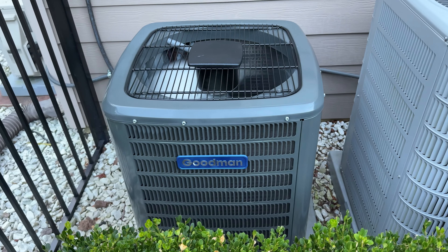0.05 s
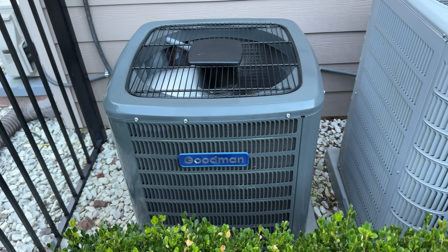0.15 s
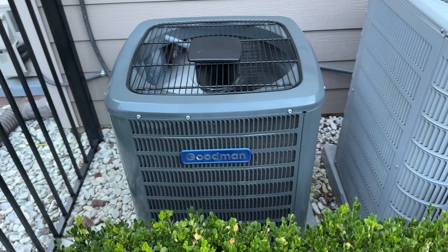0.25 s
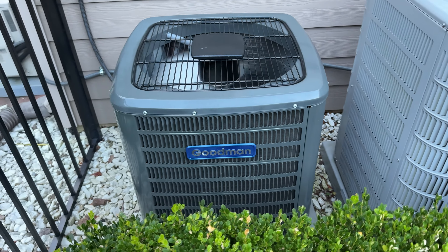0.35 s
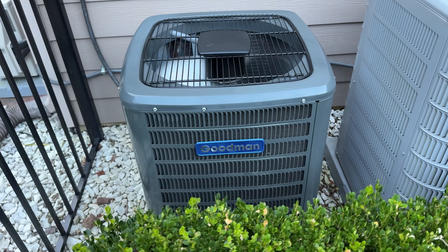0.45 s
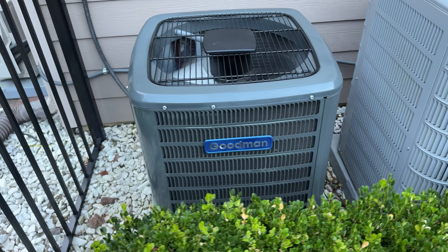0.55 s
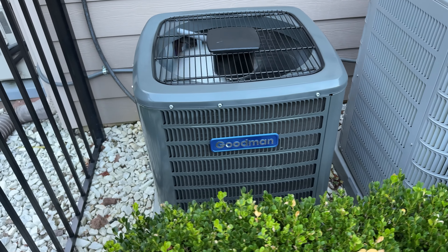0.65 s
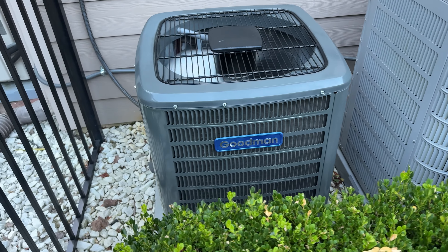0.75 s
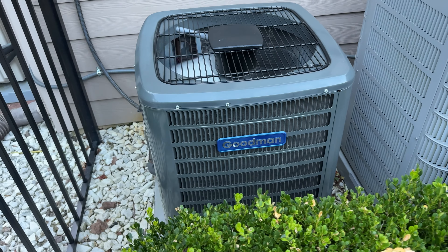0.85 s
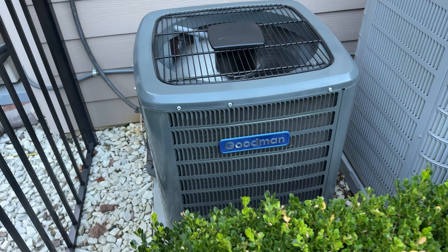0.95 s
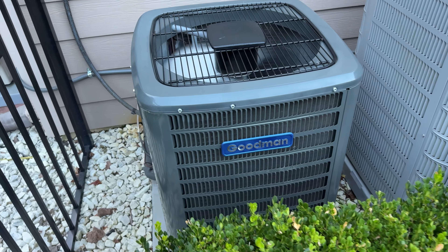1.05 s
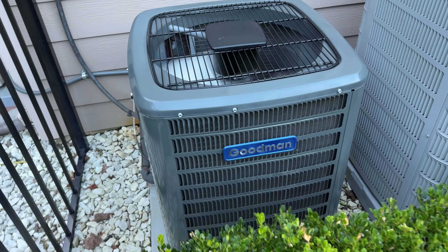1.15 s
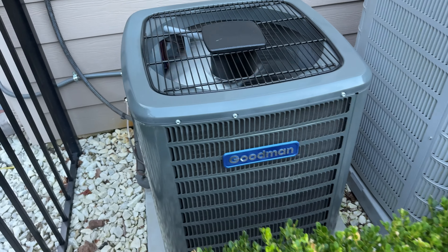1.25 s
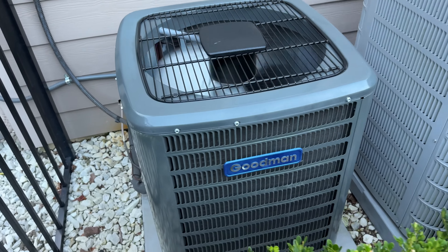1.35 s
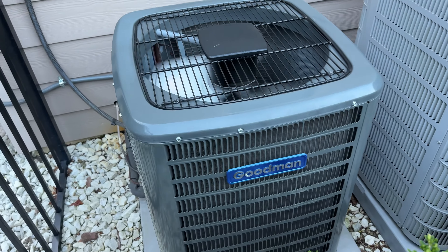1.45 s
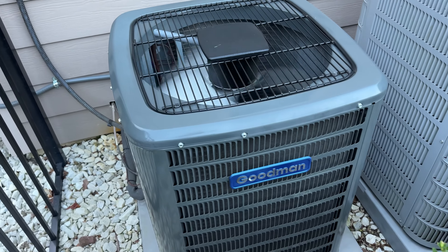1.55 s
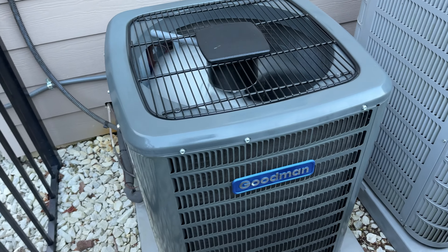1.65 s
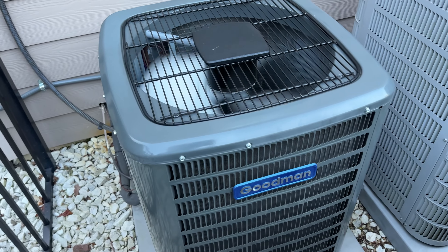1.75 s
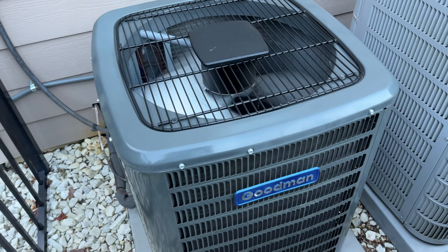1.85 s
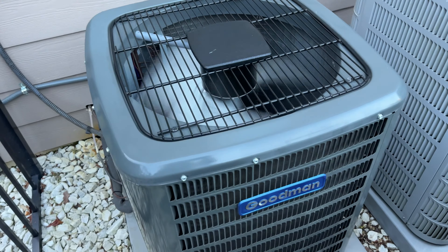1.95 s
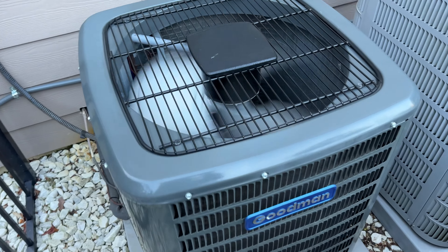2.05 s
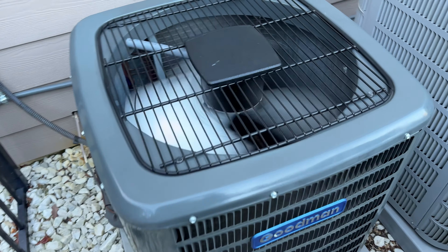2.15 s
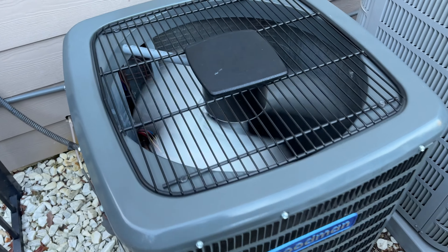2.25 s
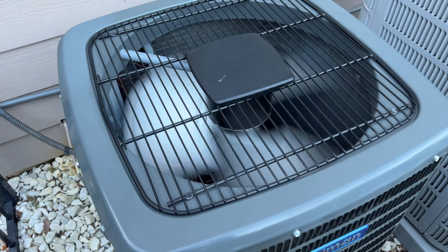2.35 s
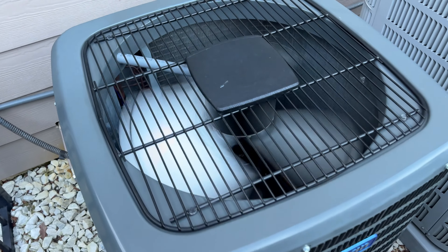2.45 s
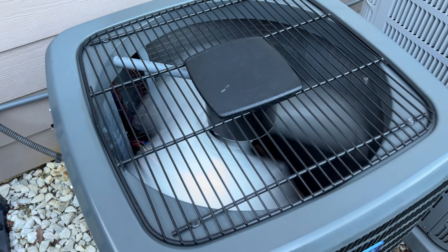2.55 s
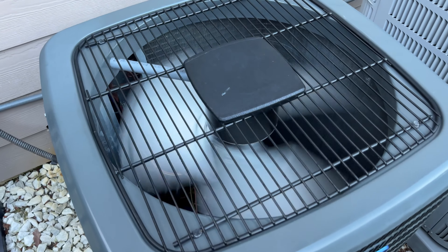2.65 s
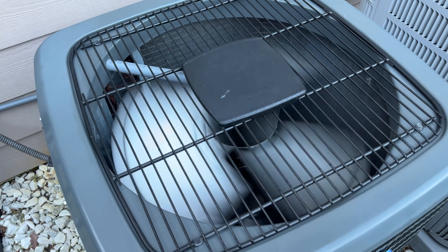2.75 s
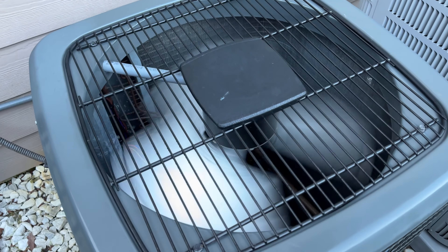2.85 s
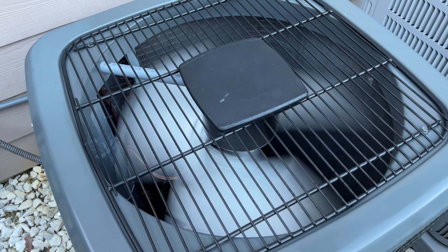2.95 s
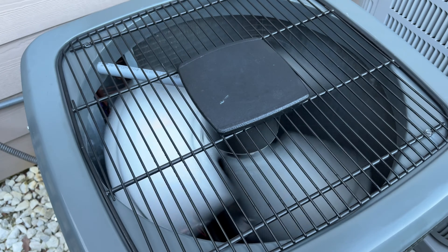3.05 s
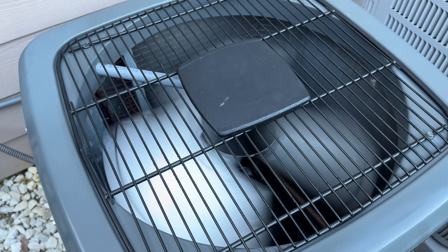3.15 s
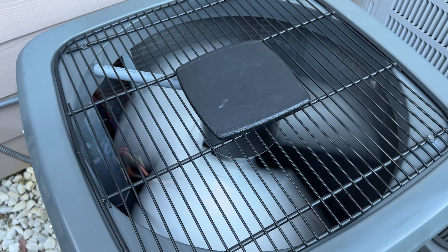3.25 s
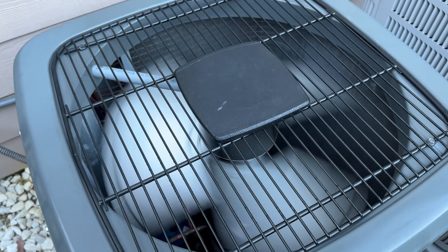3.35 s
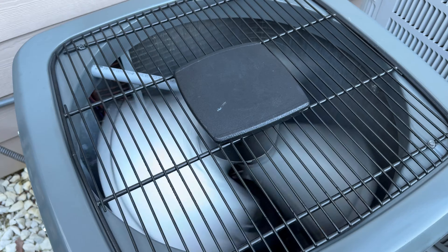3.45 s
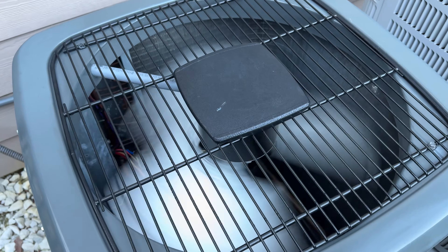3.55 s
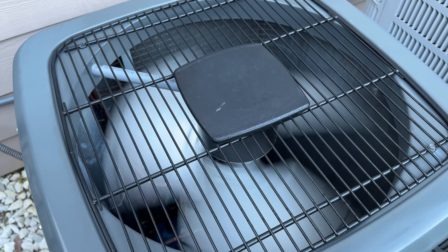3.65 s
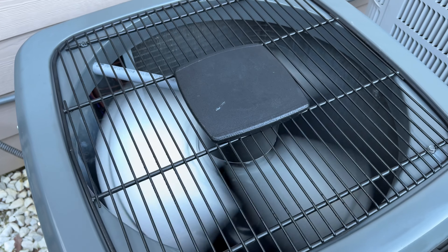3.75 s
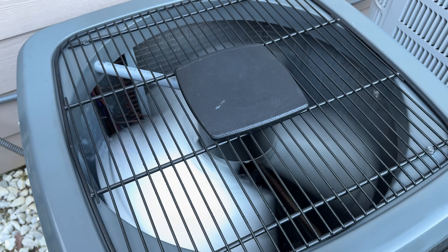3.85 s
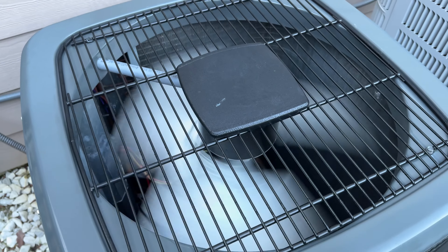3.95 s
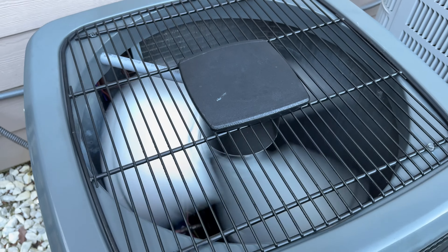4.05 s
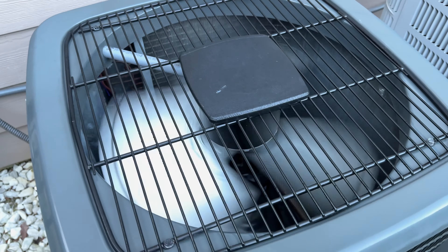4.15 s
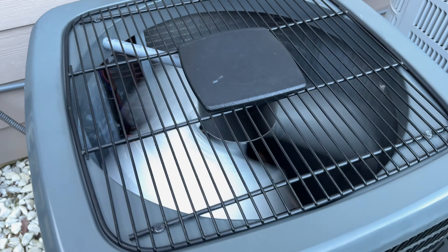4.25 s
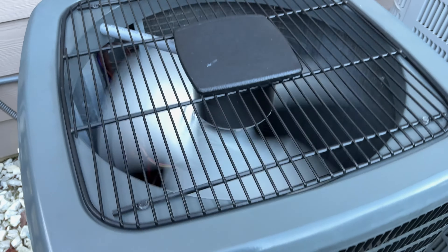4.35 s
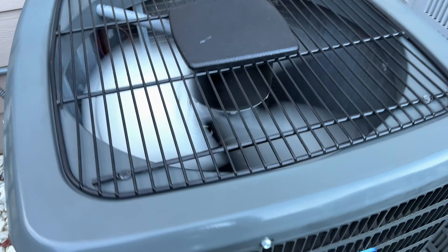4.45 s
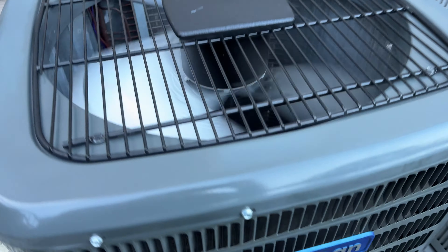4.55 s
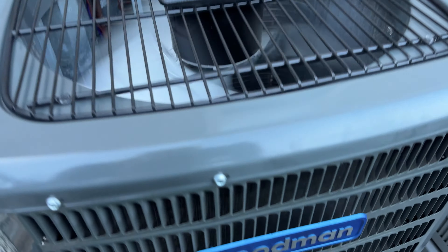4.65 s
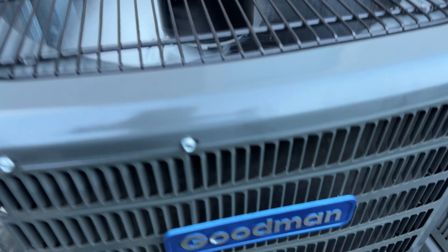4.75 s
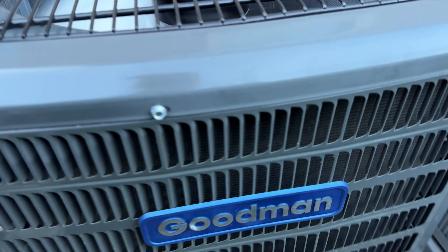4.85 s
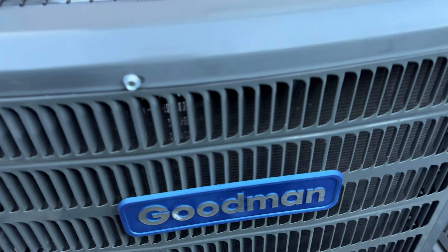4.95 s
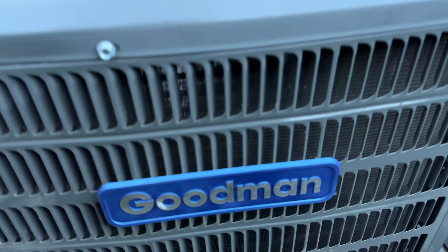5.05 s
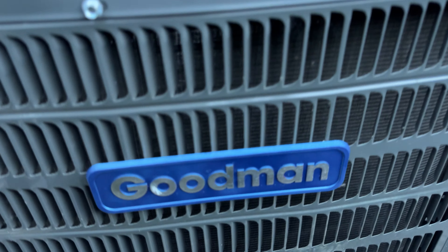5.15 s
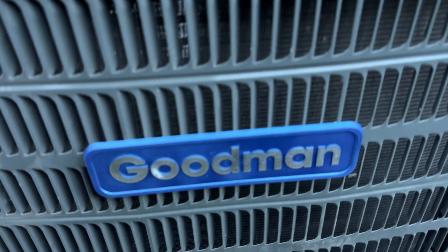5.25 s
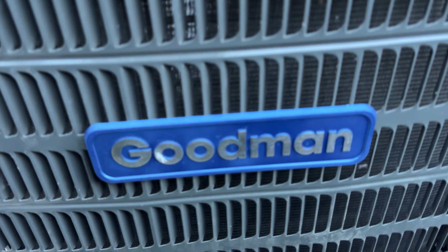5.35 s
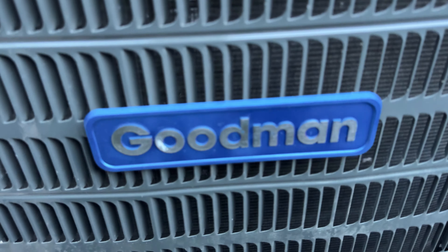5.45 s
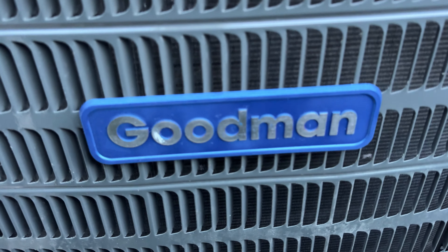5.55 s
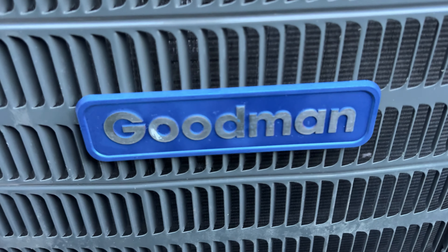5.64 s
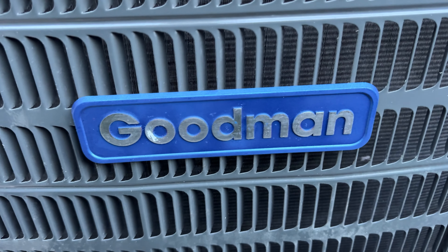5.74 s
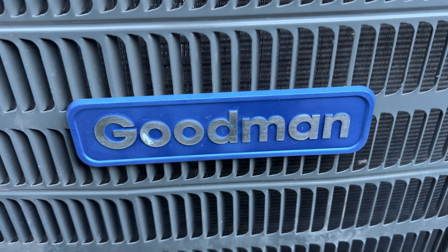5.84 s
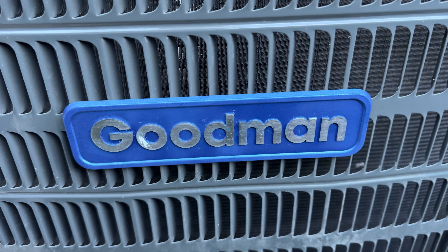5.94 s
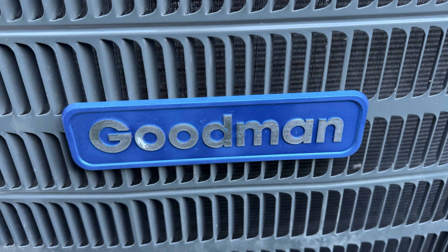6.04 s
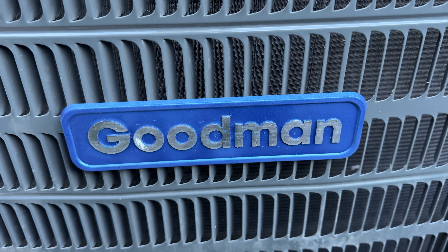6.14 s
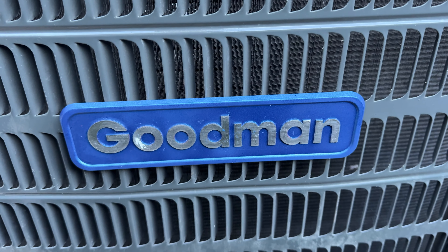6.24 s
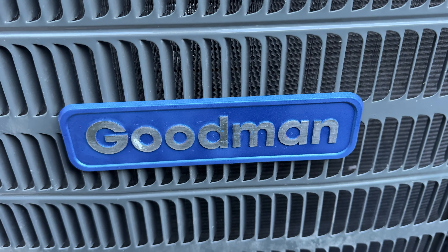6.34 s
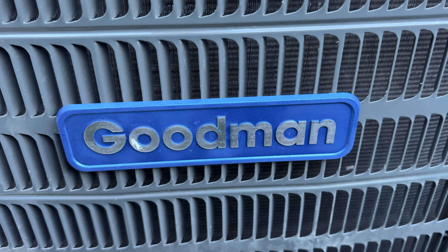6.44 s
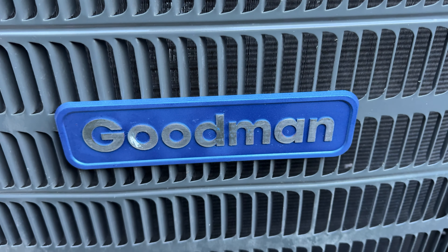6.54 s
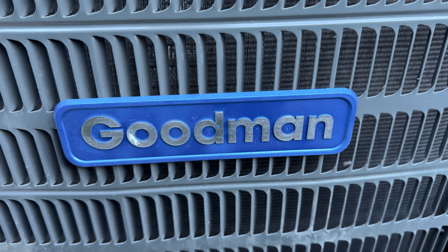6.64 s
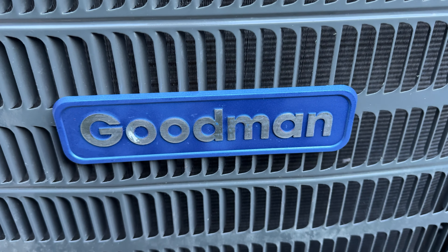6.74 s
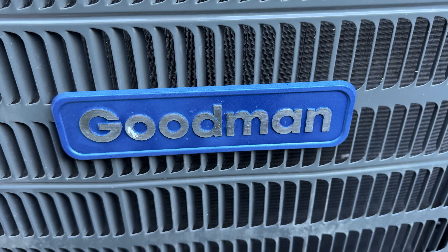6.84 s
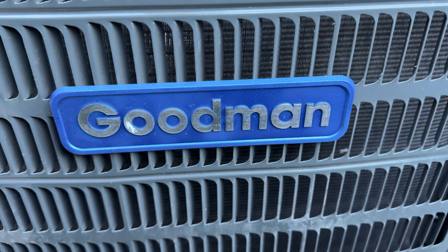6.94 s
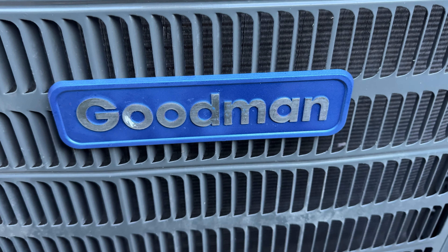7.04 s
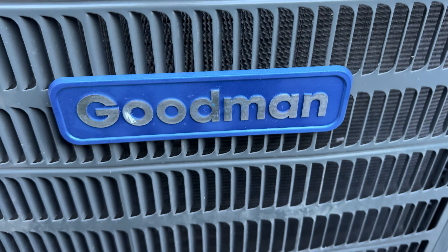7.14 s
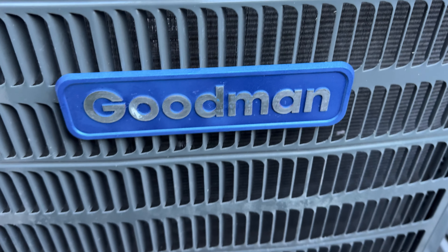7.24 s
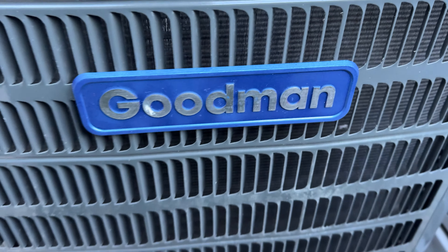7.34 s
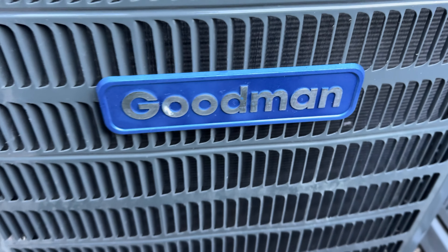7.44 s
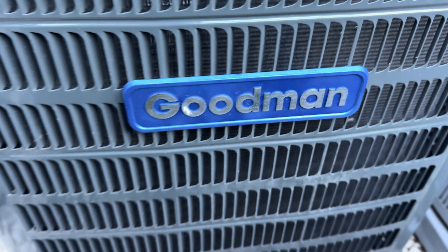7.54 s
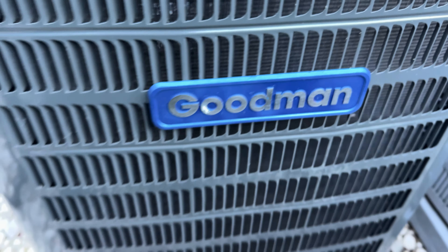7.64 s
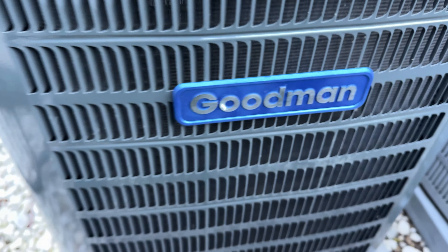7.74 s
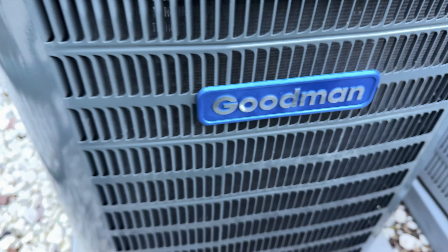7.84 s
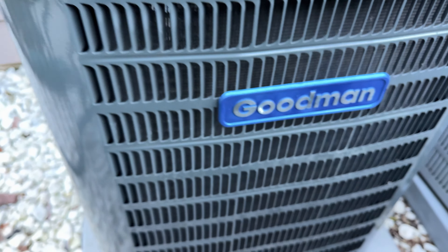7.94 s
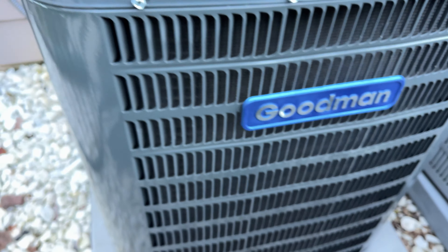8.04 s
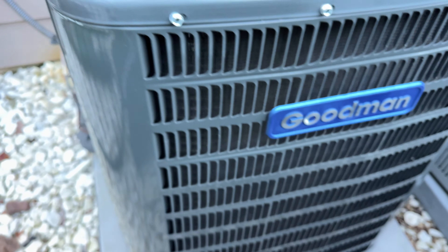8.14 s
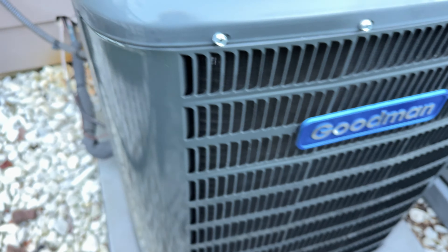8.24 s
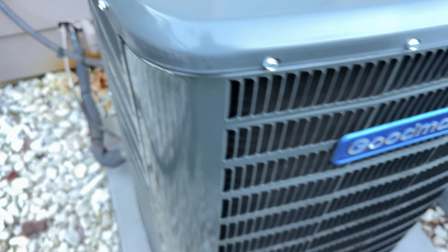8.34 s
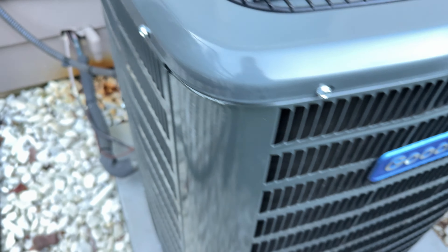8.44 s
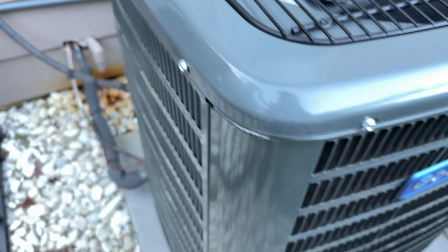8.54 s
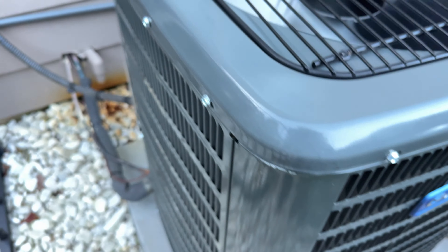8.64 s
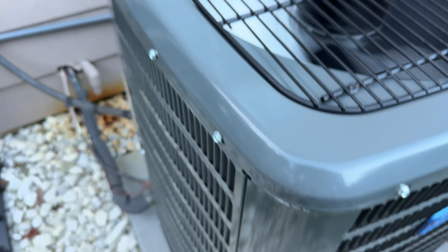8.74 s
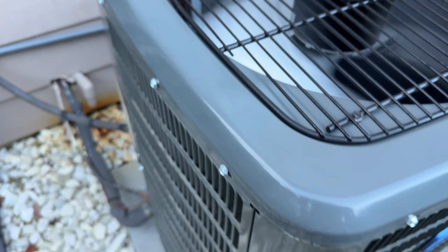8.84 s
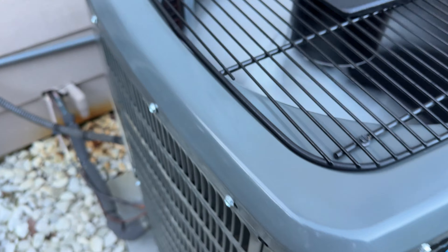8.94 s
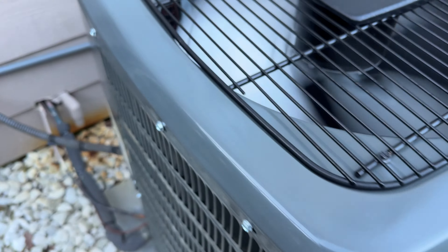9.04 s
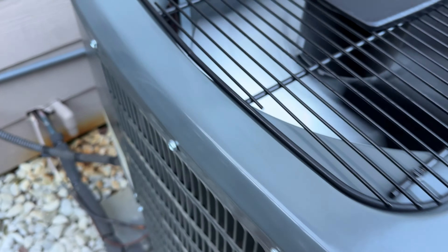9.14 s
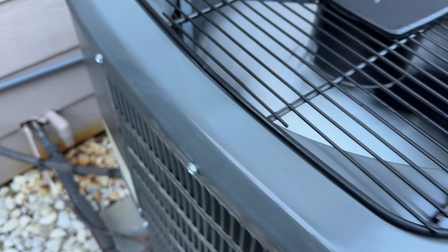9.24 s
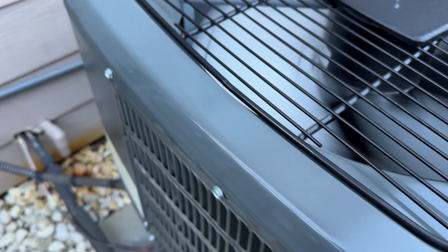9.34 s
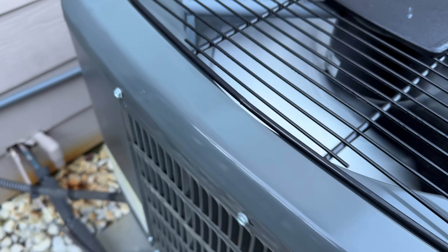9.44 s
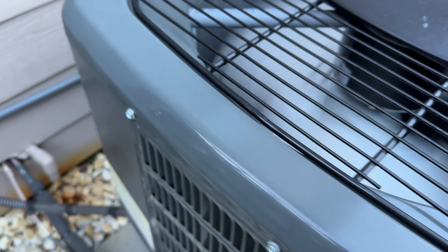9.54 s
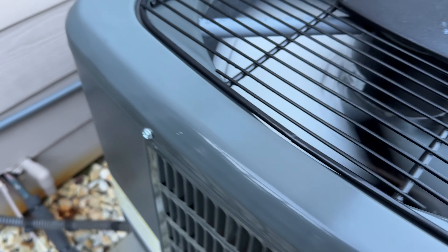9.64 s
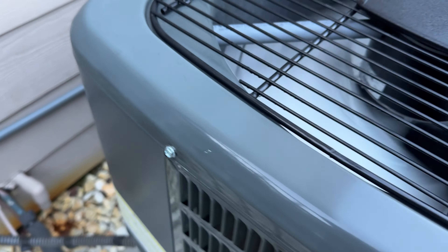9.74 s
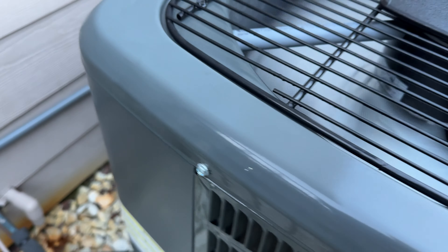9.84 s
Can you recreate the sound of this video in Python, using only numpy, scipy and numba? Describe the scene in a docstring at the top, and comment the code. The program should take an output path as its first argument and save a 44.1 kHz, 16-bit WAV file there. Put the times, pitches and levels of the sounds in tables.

```python
"""Heat pump walk-around

An outdoor heat pump runs while a hand-held stereo microphone walks up, passes over the fan, rests by
the side louvres and rises again. Blade beat, mains hum, motor tones and compressor whine are sines over
rushing air, all following the microphone's position. Over the fan, eddies buffet the microphone."""
import sys
import numpy as np
from scipy import signal
from scipy.io import wavfile
from scipy.ndimage import uniform_filter1d
from numba import njit

SR = 44100
rng = np.random.default_rng(int(sys.argv[2]) if len(sys.argv) > 2 else 0)


def bounce(signal):
    """Save signal as a 16-bit WAV file at the path given by the first command-line argument."""
    frames = np.transpose(np.atleast_2d(signal))
    limited = np.clip(frames, -1, 1)
    pcm = np.round(limited * 32767).astype(np.int16)
    wavfile.write(sys.argv[1], SR, pcm)


N = 436149

BLADE_HZ, HUM_HZ, COMPRESSOR_HZ = 42.93, 119.97, 58.53
SOUND_M_PER_S = 343
BLOCK = 256  # samples per control step of the tones

# Microphone path. Each row: time in seconds, distance in m, facing the louvres 0-1, over the outlet 0-1.
WALK = [(0.0, 1.47, 0.1, 0.05), (1.0, 1.4, .03, 0.05), (1.9, 1.23, .2, 0.4), (2.5, 0.93, 0.26, 0.83),
        (3.2, 0.89, 0.05, .95), (3.6, 0.76, 0, 0.96), (4.0, 0.74, .1, 0.92), (4.5, .7, 0.34, 0.74),
        (5.0, 0.59, 0.6, 0.68), (5.5, .47, 0.95, .1), (6.3, .43, 0.94, 0.11), (7.5, .45, .95, 0.18),
        (8.0, 0.61, .65, 0.22), (8.3, 0.53, 0.4, 0.22), (8.9, 0.53, 0.39, 0.52), (9.5, 0.44, 0.08, 0.67),
        (9.89, 0.44, 0.24, 0.47)]
# Stereo width by frequency: how alike left and right sound, and how far right leads.
# Each row: frequency in Hz, left-right coherence, right lead in radians.
STEREO_IMAGE = [(60, 0.83, 0), (250, 0.97, 0), (600, 0.88, 0), (1170, 0.68, -0.75), (1900, 0.31, -0.5),
                (3400, 0.82, -2), (5200, .15, -.6), (6200, .45, 0), (7100, .1, 0), (7800, .7, 0),
                (8700, .75, .9), (9500, 1, np.pi), (11440, 1.05, 7.5), (12300, 1.05, 8.5),
                (13700, 1.05, 11), (15400, 1.05, 15.5)]
# Gains of the air's rumble, roar, whoosh and hiss.
# Each row: dB at 1 m, dB per halved distance, dB added at the louvres, dB added over the outlet.
AIR_BANDS = [(-4, 2.9, 1, 5.7), (-1.07, 1.12, 1, 6.45), (0.1, 4.3, -3, 1.1), (3.5, 0.47, -0.2, 2.4)]


def blades_and_hum(t, sent_s):
    """Blade beat and mains hum with their octaves; the balance shifts as the hand turns."""
    # One row per tone of hz. Each row: level in dB at 1 m, then gains in dB as in AIR_BANDS.
    tone_levels = [(-52.5, 15, -5, 11), (-39, 5, -2.5, 3.5), (-38, 2.9, -1.7, 5.5), (-30.5, -1, -2.5, 7),
                   (-35.5, 1.5, -1, 4.5)]
    # Each row: time in seconds, left minus right in dB.
    hand_turn = [(0.0, 0.5), (7.65, -0.5), (9.14, -2.5), (9.89, -5.5)]
    hz = np.array([BLADE_HZ, 2 * BLADE_HZ, HUM_HZ, 2 * HUM_HZ, 4 * HUM_HZ])
    level_db = walk_db(tone_levels, t) + bass_dip_db(hz, t) + 0.84 * drift(len(hz), 5.1, t)
    pan_db = np.array([1.6, 1.9, 0.7, -0.0069, -0.52])
    lead_rad = np.array([0.27, 0.084, 0.046, 0.16, 0.21])
    turn_db = at_times(hand_turn, np.arange(N) / SR)[0]
    return stereo_tones(hz, 0 * hz, level_db, pan_db, lead_rad, sent_s) * amp(np.outer([.5, -.5], turn_db))


def fan_motor(t, sent_s, near_db):
    """Motor tones: hum multiples shifted by whole shaft turns; higher ones waver more."""
    # Each row: frequency in Hz, level in dB at the louvres, level in dB elsewhere.
    motor_tones = [(129.8, -48, -53.5), (173.2, -47.5, -67), (226.6, -52, -56), (256, -48, -50),
                   (271, -43, -53), (283, -50, -50.8), (302, -46, -49), (327.3, -52, -60), (343, -67, -47),
                   (387, -45, -48), (528, -52.5, -54), (715, -56, -57), (1270, -47.5, -56),
                   (1309, -52, -57), (1383, -47, -59.1), (1440, -56, -68.4), (1407, -48, -68),
                   (1425, -56, -64), (1426, -51, -58), (1513, -54, -61), (2340, -54.5, -89),
                   (2470, -51, -67), (2544, -59.5, -69), (2857, -52.5, -58), (2880, -61, -62)]
    hz, louvre_db, elsewhere_db = np.transpose(motor_tones)
    facing = at_times(WALK, t)[1]
    level_db = np.outer(louvre_db, facing) + np.outer(elsewhere_db, 1 - facing) + near_db
    level_db += (2.0 + hz[:, None] / 2500) * drift(len(hz), 4, t)
    start_rad, pan_db, lead_rad = random_placement(hz)
    return stereo_tones(hz, start_rad, level_db, pan_db, lead_rad, sent_s)


def compressor(t, sent_s, near_db):
    """Whine of shaft harmonics: all sound faintly, the casing lifts some."""
    # Each row: shaft order, level in dB at the louvres, from afar and over the outlet,
    # left minus right in dB, right lead in radians.
    lifted_orders = [(2, -39.3, -44, -44, 1.3, -0.1), (4, -46.3, -45.2, -45.2, 0.5, 0.1),
                     (17, -39.6, -56, -51, -3.4, 0.2), (24, -46.9, -62, -61, 3.8, -0.7),
                     (25, -45.2, -59, -53, -9.8, -0.3), (26, -44.5, -50, -56, 8.5, 1.6),
                     (27, -53, -66, -69, 6.8, 0.3), (28, -36.5, -51, -52, 1.4, -0.2),
                     (40, -54, -63, -59, -3.5, -3.0), (46, -52, -68, -63, 1.1, 0.3),
                     (56, -57.7, -67.7, -67.7, -0.7, -0.9), (58, -48, -62, -58, 8.2, 3.1),
                     (66, -58, -58, -66, 3.2, -0.7), (68, -51, -62, -72, -4.4, -0.2),
                     (75, -63.6, -60, -65, -4.5, -1.2), (76, -56, -65, -64, -4.2, -1.0),
                     (84, -54.5, -60, -56, -0.6, -1.8), (85, -63, -63, -62, 0, -.5),
                     (86, -59, -59, -57, -0.9, 2.1), (96, -55, -68, -68, -3.8, 0.8),
                     (100, -58, -70.2, -70.2, -9.9, 0.4), (102, -56.5, -65, -68, -1.6, 0.2),
                     (106, -62.9, -65.4, -65.4, -7.3, -0.3), (124, -62, -65, -66, 0.6, -0.4),
                     (130, -68, -58, -74, 0, 0), (132, -51.5, -64, -64, -0.8, -0.1),
                     (135, -59, -68, -64, -1.1, 0.5), (140, -62.4, -66, -66, -5.0, 0.6)]
    # Envelope of the other orders. Each row: frequency in Hz, level in dB.
    faint_envelope = [(500, -53), (1500, -54), (3000, -84), (8000, -79), (11000, -61.5), (15000, -62)]
    # Brief swells. Each row: centre in seconds, shaft order, gain in dB, half length in seconds.
    swells = [(0.3, 130, 6, .3), (2.5, 85, 5, .3), (4.77, 58, 12, .1), (4.85, 84, 8, .25),
              (8.85, 28, 6, .2), (8.9, 58, 5, .2)]
    # Each row: time in seconds, compressor distance minus fan motor distance in m.
    extra_path = [(0, -.25), (2, 0), (4.4, .45), (6.8, .95), (7.6, .85), (9.9, .2)]
    _, facing, outlet = at_times(WALK, t)
    order = np.arange(1, 268)
    hz = order * COMPRESSOR_HZ
    start_rad, pan_db, lead_rad = random_placement(hz)
    louvre_db = at_freqs(faint_envelope, hz)[0] - 9 * rng.random(len(order))
    far_db, top_db = louvre_db - 8.5, louvre_db - 6.5
    lifted, *columns = np.transpose(lifted_orders)
    at = np.round(lifted).astype(int) - 1
    louvre_db[at], far_db[at], top_db[at], pan_db[at], lead_rad[at] = columns
    # standing patterns make high orders come and go as the microphone moves
    depth_db = np.minimum(order / 60, 1)[:, None] * (10 - 4 * facing)
    wander_db = depth_db * (.7 - abs(drift(len(order), 6, t)))
    above = np.clip(2 * outlet, 0, 1)
    elsewhere_db = np.outer(far_db, 1 - above) + np.outer(top_db, above)
    level_db = np.outer(louvre_db, facing) + elsewhere_db * (1 - facing) + near_db + wander_db
    for centre_s, multiple, gain_db, half_s in swells:
        bell = np.exp(-((t - centre_s) / half_s) ** 2)
        level_db[multiple - 1] += bell * (gain_db - wander_db[multiple - 1])
    delay_s = uniform_filter1d(at_times(extra_path, t)[0], size=80) / SOUND_M_PER_S
    start_rad[:2] = 0  # times the 3 Hz throb of order 2 against the hum
    return stereo_tones(hz, start_rad, level_db, pan_db, lead_rad, sent_s - delay_s)


def buffets(opposed_db=-14):
    """Each eddy is a short pressure swing that dies away falling in pitch, with finer swirls on top."""
    # Each row: time in seconds, envelope peak in dB, pitch in Hz.
    eddies = [(2.856, -2.5, 160.5), (2.864, -4.5, 355), (2.877, -5, 176), (2.916, -8, 189),
              (2.937, -6, 307), (2.951, -7, 192), (3.002, -11, 109.3), (3.025, -7, 345), (3.046, -14, 132),
              (3.062, -20, 80), (3.306, -16, 157), (3.317, -4.5, 171), (3.346, -8.5, 315),
              (3.375, -18, 69.7), (3.401, -8, 337), (3.41, -10, 194), (3.424, -8, 111), (3.441, -5.5, 273),
              (3.55, -10.5, 247), (3.566, -14, 88.3), (3.604, -11, 344), (3.612, -14, 151),
              (3.687, -12, 140), (3.707, -9, 156), (3.907, -8, 360), (3.914, -4, 330), (3.923, -11.5, 98.3)]
    out = np.zeros((2, N))
    phases_rad = 2 * np.pi * rng.random((len(eddies), 2))
    swirls = unit_rms(butterworth(rng.standard_normal(N), 3, [450, 880], "band"))
    for (time_s, peak_db, hz), (common_rad, opposed_rad) in zip(eddies, phases_rad):
        centre, before = round(time_s * SR), int(2 * SR / hz)
        cycles = np.arange(-before, 2 * before) / SR * hz
        envelope = amp(peak_db) * np.exp(-.5 * (cycles / np.where(cycles < 0, .45, .8)) ** 2)
        phase = 2 * np.pi * (cycles - 0.14 * cycles * abs(cycles))
        common = envelope * (np.cos(phase + common_rad) + 0.12 * swirls[centre:][:len(cycles)])
        opposed = envelope * amp(opposed_db) * np.cos(phase + opposed_rad)
        out[:, centre - before:centre + 2 * before] += [common + opposed, common - opposed]
    return out


def turbulence():
    """Low rumble of the air stream on the microphone, between the buffets."""
    # Each row: time in seconds, level in dB.
    gusts = [(2.75, -38), (2.874, -13.5), (3.052, -16), (3.142, -42), (3.358, -19.5), (4.0, -42)]
    t = np.arange(N) / SR
    mid, side = butterworth(rng.standard_normal((2, N)), 2, [35, 90], "band")
    fade = np.interp(t, [gusts[0][0], gusts[1][0], gusts[-2][0], gusts[-1][0]], [0, 1, 1, 0])
    return fade * amp(at_times(gusts, t)[0]) * unit_rms(mid + np.outer([.15, -.15], side))


def rushing_air(fft_size=2048, hop=512):
    """Noise whose colour blends along the walk, lightly chopped by blades and compressor."""
    # Each row: frequency in Hz, density in dB per Hz at the louvres and elsewhere.
    base_spectrum = [(28, -77, -83), (60, -61, -61), (180, -65.5, -63), (350, -61, -63),
                     (657, -64.5, -64.5), (700, -66, -59.5), (818, -64.5, -67), (1265, -70.5, -73),
                     (2040, -74.5, -77), (2470, -73, -76), (4930, -78, -83), (6900, -82.5, -89),
                     (7840, -79.5, -85.5), (8900, -86, -91), (15500, -85, -91)]
    # Centre in Hz of each row of AIR_BANDS.
    centres_hz = [170, 500, 2400, 7000]
    t = np.arange(N // hop + 5) * hop / SR
    hz = np.fft.rfftfreq(fft_size, 1 / SR)
    left_re, left_im, other_re, other_im, patches = rng.standard_normal((len(t), len(hz), 5)).T
    patches = uniform_filter1d(patches, size=20, axis=0)
    patches = unit_rms(uniform_filter1d(patches, size=8, axis=1))
    facing = at_times(WALK, t)[1]
    louvre_db, elsewhere_db = at_freqs(base_spectrum, hz)
    band_share = at_freqs(np.c_[centres_hz, np.eye(4)], hz)
    level_db = np.outer(louvre_db, facing) + np.outer(elsewhere_db, 1 - facing)
    level_db += band_share.T @ walk_db(AIR_BANDS, t) + bass_dip_db(hz, t) + 1.13 * patches
    level_db += 0.79 * np.outer(band_share[3], drift(1, 10, t)[0])  # the hiss flutters
    coherence, lead_rad = at_freqs(STEREO_IMAGE, hz)[..., None]
    coherence = np.clip(coherence, 0, 1)
    left, other = left_re + 1j * left_im, other_re + 1j * other_im
    right = coherence * np.exp(1j * lead_rad) * left + np.sqrt(1 - coherence ** 2) * other
    spectra = np.array([left, right]) * amp(level_db) * np.sqrt(1.5 * SR / fft_size)
    rush = signal.istft(spectra, nperseg=fft_size, noverlap=fft_size - hop)[1][:, :N]
    sample_s = np.arange(N) / SR
    blade_chop = 0.18 * butterworth(rush, 2, 1800, "low") * np.sin(2 * np.pi * BLADE_HZ * sample_s)
    return rush * (1 + 0.02 * np.sin(2 * np.pi * 2 * COMPRESSOR_HZ * sample_s)) + blade_chop


def bass_dip_db(hz, t, start_s=3.93, depth_db=-13.5, top_hz=330, return_s=0.44):
    """After the last buffet the bass thins out, then returns from the top down."""
    corner_hz = top_hz * np.exp(-np.maximum(t - start_s, 0) / return_s) * (t > start_s)
    return depth_db * corner_hz ** 2 / (corner_hz ** 2 + hz[:, None] ** 2 + 1)


def walk_db(rows, t):
    """Level of each row along the walk, from distance, louvres and outlet."""
    distance_m, facing, outlet = at_times(WALK, t)
    halvings = -np.log2(np.maximum(distance_m, .1))
    return np.array(rows) @ [np.ones(len(t)), halvings, facing, outlet]


def random_placement(hz):
    """Start phase, pan and right lead per tone, looser where the channels are less coherent."""
    start_turns, *draws = rng.random((len(hz), 3)).T
    coherence, lead_rad = at_freqs(STEREO_IMAGE, hz)
    scatter = (1 - np.clip(coherence, 0, 1)) * (2 * np.array(draws) - 1)
    return 2 * np.pi * start_turns, 8 * scatter[0], lead_rad + 3 * scatter[1]


def stereo_tones(hz, start_rad, level_db, pan_db, lead_rad, sent_s):
    """Panned tones of given rms level over time."""
    channel_db = level_db[:, None] + np.multiply.outer(pan_db, [.5, -.5])[..., None]
    return sine_bank(hz, start_rad, lead_rad, np.sqrt(2) * amp(channel_db), sent_s)[:, :N]


@njit
def sine_bank(hz, start_rad, lead_rad, gain, sent_s):
    """Sum of sines; gain (tone, channel, block) and emission time are given once per block."""
    out = np.zeros((2, (len(sent_s) - 1) * BLOCK))
    for k in range(len(hz)):
        lead_cos, lead_sin = np.cos(lead_rad[k]), np.sin(lead_rad[k])
        for j in range(len(sent_s) - 1):
            phasor = np.exp(1j * (2 * np.pi * hz[k] * sent_s[j] + start_rad[k]))
            step = np.exp(2j * np.pi * hz[k] * (sent_s[j + 1] - sent_s[j]) / BLOCK)
            for i in range(j * BLOCK, (j + 1) * BLOCK):
                out[0, i] += gain[k, 0, j] * phasor.imag
                out[1, i] += gain[k, 1, j] * (lead_cos * phasor.imag + lead_sin * phasor.real)
                phasor *= step
    return out


def drift(count, top_hz, t):
    """Rows of slow random wandering, rms 1 overall."""
    hz = np.geomspace(.1, top_hz, 8)[:, None]
    sines = np.sin(2 * np.pi * (hz * t + rng.random((count, 8, 1))))
    return unit_rms((sines / np.sqrt(hz)).sum(1))


def at_times(rows, t):
    """Table columns interpolated at times t."""
    row_s, *columns = np.transpose(rows)
    return np.array([np.interp(t, row_s, c) for c in columns])


def at_freqs(rows, hz):
    """Table columns interpolated at hz, on a log axis."""
    row_hz, *columns = np.transpose(rows)
    return np.array([np.interp(np.log(hz + 1), np.log(row_hz + 1), c) for c in columns])


def butterworth(x, order, hz, kind):
    """Causal Butterworth filter."""
    return signal.sosfilt(signal.butter(order, hz, kind, fs=SR, output="sos"), x)


def amp(db):
    """Decibels to gain."""
    return 10 ** (np.asarray(db) / 20)


def unit_rms(x):
    """Scales to rms 1."""
    return x / np.sqrt(np.mean(x ** 2) + 1e-20)


def scene():
    """Machine tones, air and buffeting; walking changes the path delay and so bends the tones."""
    t = np.arange(N // BLOCK + 2) * BLOCK / SR
    sent_s = t - uniform_filter1d(at_times(WALK, t)[0], size=50) / SOUND_M_PER_S
    near_db = 0.15 * walk_db(AIR_BANDS, t)[2]  # motor and compressor follow the whoosh slightly
    machine = blades_and_hum(t, sent_s) + fan_motor(t, sent_s, near_db) + compressor(t, sent_s, near_db)
    return machine + rushing_air() + buffets() + turbulence()


def record(dry, ceiling=.95, edge_hz=15750):
    """The input stage cuts the deepest bass and rounds off the hardest buffets; then the band limit."""
    cut = butterworth(dry, 2, 32, "high")
    rounded = cut / (1 + abs(cut / ceiling) ** 4) ** .25
    lowpass = signal.firwin(511, edge_hz, window=("kaiser", 9), fs=SR)
    return signal.oaconvolve(rounded, lowpass[None], "same")


dry = scene()
out = record(dry)
bounce(out)
```